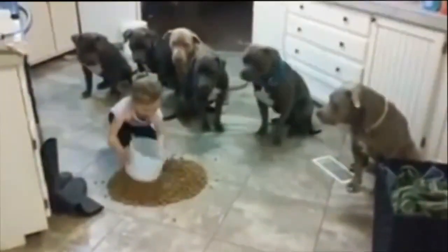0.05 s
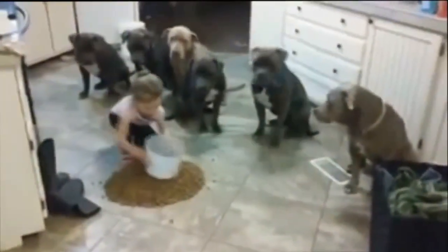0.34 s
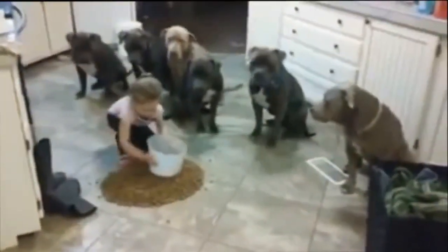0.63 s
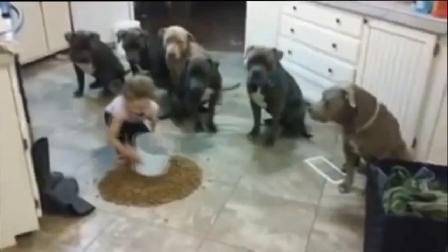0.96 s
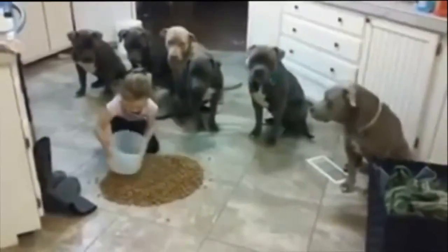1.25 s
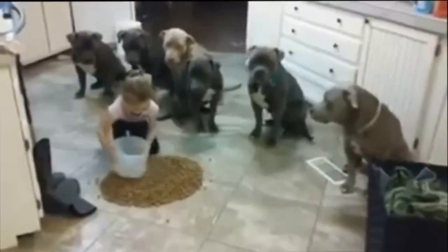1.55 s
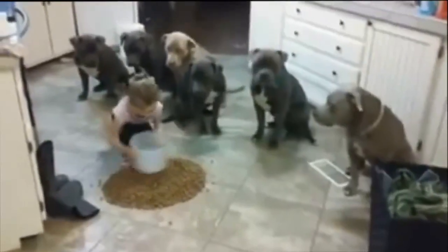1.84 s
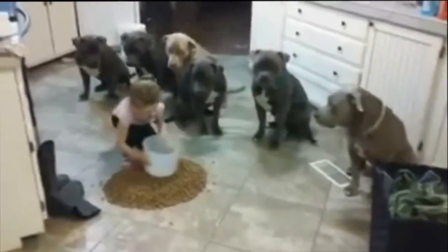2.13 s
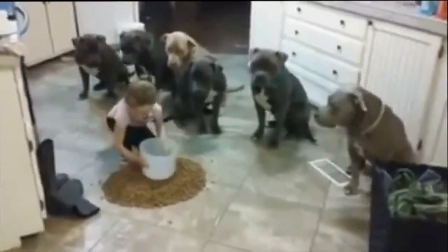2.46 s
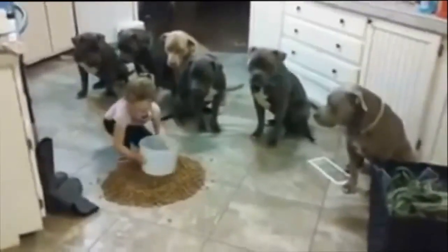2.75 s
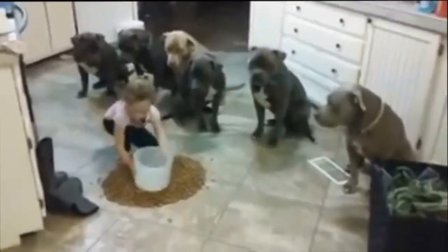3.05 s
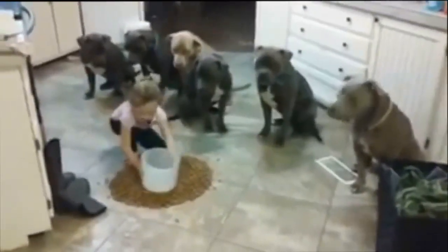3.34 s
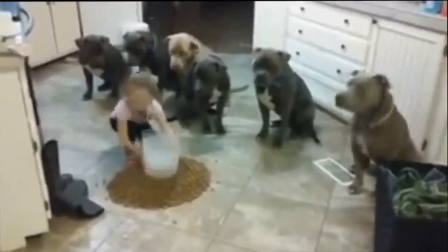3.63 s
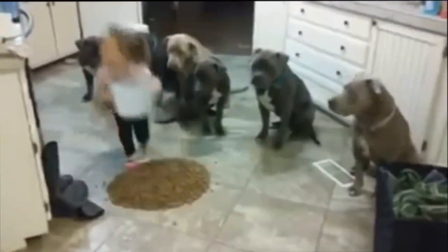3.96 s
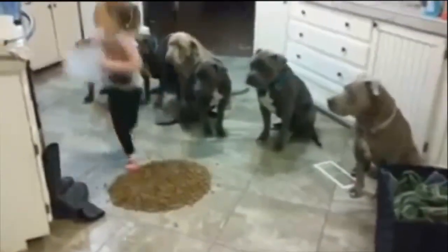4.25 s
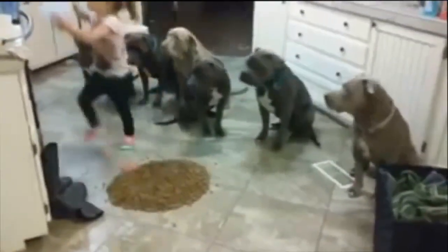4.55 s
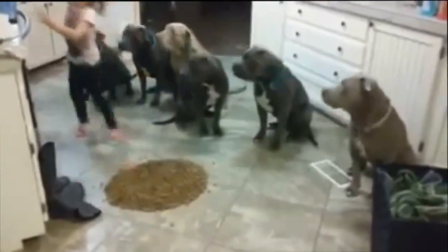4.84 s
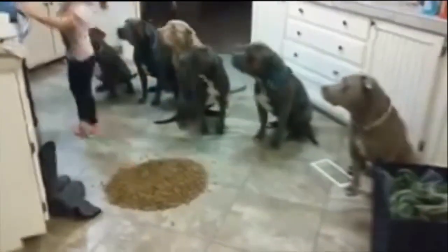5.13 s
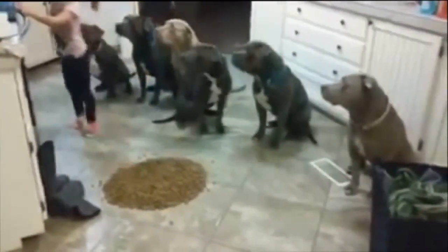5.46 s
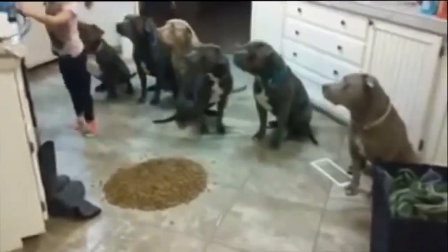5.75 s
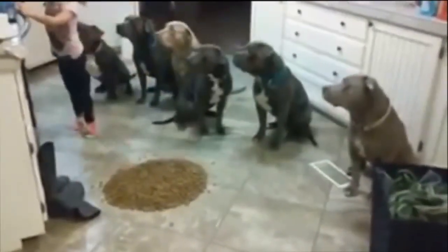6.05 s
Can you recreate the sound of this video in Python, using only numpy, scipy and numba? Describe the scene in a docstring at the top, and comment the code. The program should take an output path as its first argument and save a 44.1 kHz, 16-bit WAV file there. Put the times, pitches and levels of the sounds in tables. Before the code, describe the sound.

A hollow plastic tub scrapes through kibble on a hard floor, followed by soft footsteps and the tub knocking onto a counter.

```python
"""Dry dog food crunches and rattles as a child shoves it over a tiled kitchen floor with an empty plastic tub.
Stroke by stroke, colliding pellets drive the tub's ringing walls and drum-like base. Soft steps and
rustling clothes follow; the tub knocks down on a counter and rocks to rest.
The hard room rings briefly over a low, steady motor hum."""
import sys
import numpy as np
from scipy import signal
from scipy.fft import rfft, irfft
from scipy.io import wavfile
from scipy.ndimage import uniform_filter1d
from numba import njit

SR = 44100
rng = np.random.default_rng(int(sys.argv[2]) if len(sys.argv) > 2 else 0)


def materialize(psi):
    """Save the field psi as 16-bit PCM at rate SR to the path in sys.argv[1].

    A 1-D psi becomes a single channel; in a 2-D psi each row is a channel.
    """
    bounded = np.clip(np.atleast_2d(psi).T, -1, 1)
    quanta = np.round(bounded * 32767).astype(np.int16)
    wavfile.write(sys.argv[1], SR, quanta)


N = 269010
TIME = np.arange(N) / SR


def undb(db):
    """Decibels to gain."""
    return 10 ** (np.asarray(db) / 20)


def unit(x):
    """Scale to rms 1."""
    return x / np.sqrt(np.mean(x ** 2))


def add(track, start_s, sound):
    """Mix a sound into a track."""
    start = int(start_s * SR)
    track[start:start + len(sound)] += sound[:N - start]


def colour(x, points):
    """Minimum-phase filter through (Hz, dB) points, via the cepstrum."""
    hz, db = np.transpose(points)
    size = 4096
    bins_hz = np.maximum(np.fft.rfftfreq(size, 1 / SR), 1)
    curve_db = np.interp(np.log(bins_hz), np.log(hz), db)
    cepstrum = irfft(np.log(undb(curve_db)))
    cepstrum[1:size // 2] *= 2
    cepstrum[size // 2 + 1:] = 0
    return signal.oaconvolve(x, irfft(np.exp(rfft(cepstrum))))[:len(x)]


@njit
def resonate(x, hz, width_hz):
    """State-variable band-pass; unity gain at its moving centre."""
    y, band_state, low_state = np.empty(len(x)), 0., 0.
    for i in range(len(x)):
        g, damping = np.tan(np.pi * hz[i] / SR), width_hz / hz[i]
        band = (band_state + g * (x[i] - low_state)) / (1 + g * (g + damping))
        band_state = 2 * band - band_state
        low_state += 2 * g * band
        y[i] = damping * band
    return y


def resonate_twice(x, hz, width_hz):
    """Two equal band-passes in series."""
    return resonate(resonate(x, hz, width_hz), hz, width_hz)


def wander(rate_hz, count=N):
    """Gaussian values joined by straight lines."""
    t = TIME[:count]
    knots_s = np.arange(0, t[-1] + 1, 1 / rate_hz)
    return np.interp(t, knots_s, rng.standard_normal(len(knots_s)))


def judder(rate_hz, depth_db):
    """Randomly wavering gain, as in stick-slip; rms 1."""
    return unit(undb(depth_db * wander(rate_hz)))


def clicks(per_s, spread_db, count=N):
    """Tiny collisions of random time, sign and size; rms 1."""
    hits = rng.random(count) < per_s / SR
    size = np.minimum(rng.exponential(size=count), 4.5)
    return unit(hits * rng.choice([-1, 1], count) * undb(spread_db * size))


def decay(t, t60_s):
    """Exponential fall, 60 dB in t60_s."""
    return np.exp(-np.log(1000) * t / t60_s)


def blow(rise_s, t60_s, count):
    """Contact envelope: graze, full blow, decay; peak 1."""
    t = np.arange(count) / SR
    shape = (1 - np.exp(-t / rise_s)) ** 4 * decay(t, t60_s)
    return shape / shape.max()


def motion(start_s, attack_s, hold_s, release_db_per_s, swell_db=0):
    """Movement envelope: attack, hold or swell, release."""
    age_s = TIME - start_s
    db = swell_db * np.clip(age_s / hold_s, 0, 1) - release_db_per_s * np.maximum(age_s - hold_s, 0)
    return np.clip(age_s / attack_s, 0, 1) * undb(db)


def power_sum(gains):
    """Joint gain of overlapping movements."""
    return np.linalg.norm(gains, axis=0)


# Room air spectrum: (frequency [Hz], level [dB])
AIR_SPECTRUM = [(30, -15), (120, -10), (250, -12.5), (500, -22), (1000, -43.5), (2000, -22), (5000, -28.5),
                (12000, -23), (15000, -30.5)]


def hum_and_air():
    """A motor, likely the fridge, hums and rumbles over faint room air."""
    hum_hz, motor_db, air_db = 58.73, -53.5, -78
    hum = unit(np.sin(2 * np.pi * hum_hz * TIME) * judder(rate_hz=12, depth_db=1))
    rumble_spectrum = [(20, -12.5), (45, -3.5), (70, -10), (100, -14.5), (300, -44.5)]
    rumble = unit(colour(rng.standard_normal(N), rumble_spectrum))
    air = unit(colour(rng.standard_normal(N), AIR_SPECTRUM))
    return undb(motor_db) * (hum + undb(-10) * rumble) + undb(air_db) * air


def reflections():
    """Dense echoes off tiles and cupboards, treble lasting longest; unit energy."""
    t = np.arange(SR // 2) / SR
    noise = rng.standard_normal(len(t))
    low = signal.sosfiltfilt(signal.butter(3, 5500, fs=SR, output="sos"), noise)
    tail = low * decay(t, t60_s=.32) + (noise - low) * decay(t, t60_s=.54)
    tail *= t > .003
    return tail / np.linalg.norm(tail)


def kitchen(x, wet_db=-3.5):
    """Direct sound plus echoes whose pattern changes as child and tub move."""
    hop = SR // 4
    window = np.sin(np.pi * np.arange(2 * hop) / (2 * hop))
    padded = np.pad(x, (hop, 2 * SR))
    wet = np.zeros(len(padded))
    for start in range(0, N + hop, hop):
        echoes = signal.fftconvolve(padded[start:start + 2 * hop] * window, reflections())
        wet[start:start + len(echoes)] += echoes
    return (x + undb(wet_db) * wet[hop:hop + N]) / np.hypot(1, undb(wet_db))


# Clothing movements: (start [s], hold [s], relative level [dB])
CLOTH_MOVES = [ (3.688, 0.2, -56), (3.979, 0.021, -61), (4.371, 0.12, -63), (4.771, 0.024, -60),
               (4.845, 0.14, -61), (5.026, 0.11, -61), (5.23, 0.14, -67), (5.62, 0.02, -48),
               (5.738, 0.043, -54.5), (5.88, 0.081, -64.5), ]
# Fabric hiss: (frequency [Hz], level [dB])
CLOTH_SPECTRUM = [(60, -53), (600, -22), (1300, -13), (2300, -7), (3200, -15), (4200, -10), (5700, -14.5),
                  (8000, -5), (12500, 0.5), (15000, -2)]


def clothes(attack_s=.013, release_db_per_s=172):
    """Fabric rubs with a fine, uneven hiss as the child gets up and walks off."""
    gain = power_sum([undb(db) * motion(start_s, attack_s, hold_s, release_db_per_s)
                      for start_s, hold_s, db in CLOTH_MOVES])
    fibres = clicks(per_s=6200, spread_db=1.5) * judder(rate_hz=60, depth_db=1)
    return undb(1.5) * gain * unit(colour(fibres, CLOTH_SPECTRUM))


# Footfalls and cupboard bumps: (time [s], level [dB], rise [s], t60 [s])
THUDS = [(2.982, -56.5, 0.005, .07), (3.492, -46.5, 0.0061, 0.11), (4.020, -55.5, 0.0084, 0.054),
         (4.379, -41, 0.013, 0.19), (4.573, -39, 0.0072, 0.2), (4.780, -61.5, 0.0073, 0.33),
         (5.365, -35, 0.01, 0.28), (5.476, -49.5, 0.0045, 0.72)]
# Dull thud: (frequency [Hz], level [dB])
THUD_SPECTRUM = [(30, 2), (60, -3), (100, 3), (135, -4.5), (190, 0), (260, -8.5), (400, -27.5), (1000, -57),
                 (4000, -48)]


def steps():
    """Soft, heavy contacts thud through floor and cupboard."""
    out, count = np.zeros(N), SR // 2
    for time_s, db, rise_s, t60_s in THUDS:
        push = rng.standard_normal(count) * blow(rise_s, t60_s, count)
        add(out, time_s, undb(db) * push.std() * unit(colour(push, THUD_SPECTRUM)))
    return out


# Tub wall resonances: (frequency [Hz], width [Hz], level [dB])
TUB_WALL_MODES = [(519, 33, 3), (770, 14, -9), (858, 13, -1.5), (1020, 14, 3), (1143, 72, 3.5),
                  (1510, 130, -6.5), (1670, 72, 2.5), (1828, 56, 5), (2370, 90, -13.5), (2426, 54, -4.5),
                  (2770, 38, -21.5), (3860, 200, -24.5), (4060, 65, -22)]


def tub_walls(x, detune=.012):
    """The walls ring; flexing in the hands detunes each mode slightly."""
    out = 0
    for hz, width_hz, db in TUB_WALL_MODES:
        flexed_hz = hz * (1 + detune * wander(rate_hz=12, count=len(x)))
        out = out + undb(db) * resonate(x, flexed_hz, float(width_hz))
    return out


# Tub base resonances: (ratio to base note [1], level [dB])
TUB_BASE_MODES = [(0.999, 6), (1.332, -14), (1.6, -7.5), (2.101, -9.5)]


def tub_base(x, note_hz):
    """The struck base rings like a drum."""
    return sum(undb(db) * resonate_twice(x, np.full(len(x), float(note_hz * ratio)), width_hz=96.)
               for ratio, db in TUB_BASE_MODES)


def rocking(start_s=5.496, gap_s=.053, first_db=-34.5, loss_db=6.5):
    """Knock rows for the tub settling on the counter: evenly spaced, each weaker."""
    note_hz, base_db, treble_db, rise_s, t60_s = 434, -1.5, -12.5, .0051, .24
    return [(start_s + k * gap_s, first_db - k * loss_db, note_hz, base_db, treble_db, rise_s, t60_s)
            for k in range(5)]


# Tub hits on heap, cupboard and counter; glancing ones rise slowly:
# (time [s], level [dB], base note [Hz], base gain [dB], treble gain [dB], rise [s], chatter t60 [s])
TUB_HITS = [ (0.413, -17, 440, -29, -20, 0.0075, 0.34), (0.817, -43.5, 510, 10.5, -1, 0.0033, 0.093),
            (1.239, -34.5, 448, -26, -9, 0.0029, 0.095), (1.338, -32, 440, 6, -16, 0.0057, 0.083),
            (2.094, -17, 496, -0.5, -23.5, 0.0041, .13), (2.109, -34.5, 296, 2, -35, 0.0076, 0.32),
            (2.339, -32.5, 508, 8, -20.5, 0.0013, 0.053), (3.057, -39, 498, -5, -12.5, .007, 0.12),
            (3.612, -31, 457, -3.5, -20, 0.0083, 0.068), (4.563, -42, 415, 2.5, -5, .005, 0.25),
            (5.351, -45.5, 336, -3, -1, 0.0074, 0.11), (5.367, -31, 358, 8.5, -8, 0.0051, .12),
            (5.390, -34, 421, 8, -3, 0.0024, 0.56), (5.471, -24, 414, 6.5, -16, 0.003, .1),
            (5.912, -56, 325, 3.5, -13, .006, 0.13), (5.935, -51.5, 413, 3.5, -12.5, 0.011, 0.1), ]
# Dry plastic clack: (frequency [Hz], level [dB])
CLACK_SPECTRUM = [(60, -18.5), (150, -12), (260, -4), (400, -16), (560, -6), (900, -1), (1600, 0.5),
                  (2400, -3.5), (3200, -9), (4400, -12), (6000, -23), (15000, -35.5)]
# Crisp edge of knocks and pellet clicks: (frequency [Hz], level [dB])
CRISP_SPECTRUM = [(500, -34.5), (3500, -16), (5500, -3.5), (8000, 2.5), (10000, -1), (12300, 3.5),
                  (15000, -8.5)]


def tub_knocks():
    """Each blow is a quick chatter of contacts that clacks and rings walls and base."""
    out, count = np.zeros(N), SR // 2
    for time_s, db, note_hz, base_db, treble_db, rise_s, t60_s in TUB_HITS + rocking():
        contact = clicks(per_s=4600, spread_db=-1.5, count=count) * blow(rise_s, t60_s, count)
        clack = undb(-2) * unit(colour(contact, CLACK_SPECTRUM))
        walls = undb(-5.5) * unit(tub_walls(contact))
        base = undb(base_db) * unit(tub_base(contact, note_hz))
        crisp = undb(treble_db) * unit(colour(contact, CRISP_SPECTRUM))
        add(out, time_s, undb(db) * contact.std() * (clack + walls + base + crisp))
    return out


def rim_rasp(start_s=1.835, level_db=-29):
    """The rim skids off the heap with a short, falling rasp."""
    out, count = np.zeros(N), SR // 4
    skid = clicks(per_s=4000, spread_db=0, count=count) * blow(rise_s=.0083, t60_s=.12, count=count)
    sweep_hz = np.geomspace(2451.5, 1697.5, count)
    rasp = unit(resonate_twice(skid, sweep_hz, width_hz=1101.5))
    add(out, start_s, undb(level_db) * skid.std() * rasp)
    return out


def pellet_bounces(per_s, spread_db):
    """Single pellets clack together, each ringing briefly at its own pitch; rms 1."""
    out, t = np.zeros(N), TIME[:1000]
    centre_hz, spread_octaves, t60_cycles = 1650, .6, 14
    for when, pitch, size in rng.random((int(per_s * TIME[-1]), 3)):
        hz = centre_hz * 2 ** (spread_octaves * np.sqrt(3) * (2 * pitch - 1))
        gain = undb(spread_db * min(-np.log1p(-size), np.pi))
        add(out, when * TIME[-1], gain * np.cos(2 * np.pi * hz * t) * decay(t, t60_cycles / hz))
    return unit(out)


# Short shoves and long drags of the tub: (start [s], hold [s], level [dB], swell over hold [dB],
# release [dB/s], base note [Hz], base send [dB], crisp send [dB])
SHOVES = [ (-.02, 0.056, -21.5, -7, 289.5, 450, -7, -18.5), (0.41, 0.073, -23, 6.5, 114, 465, -5, -20.5),
          (0.519, 0.18, -27.5, 3.5, 168, 470, 2.5, -24), (0.806, 0.23, -37.5, 15.5, 366, 490, -2, -18),
          (1.248, 0.32, -31, 8.5, 108, 435, -5.5, -22), (1.588, 0.084, -31.5, 5, 129.5, 428, 1, -23),
          (1.701, .09, -28, 3, 189, 415, -5.5, -15), (2.092, 0.047, -23.5, 4, 244.5, 492, -4, -22.5),
          (2.172, 0.4, -27, -1, 274.5, 492, 2, -22.5), (3.051, 0.062, -40.5, 10.5, 146, 490, -1.5, -23),
          (3.163, 0.033, -40, -1, 109, 496.5, 4, -19.5), (3.33, 0.19, -55, 11.5, 95.5, 478, -2, -18),
          (3.484, 0.11, -42, 18.5, 263, 470, -3.5, -17.5), ]
# Pellet crunch: (frequency [Hz], level [dB])
CRUNCH_SPECTRUM = [(30, -45.5), (100, -17), (170, -16), (260, -18.5), (380, -2), (620, 2.5), (1100, 1.5),
                   (1500, 1), (2100, -2), (3000, -10.5), (4200, -13), (5200, -27.5), (7000, -47),
                   (15000, -57.5)]


def pellet_shoves(attack_s=.012):
    """Pellets tumble ahead of the rim; the same collisions drive the tub's walls and base."""
    pushes = np.array([undb(db) * motion(start_s, attack_s, hold_s, release_db_per_s, swell_db)
                       for start_s, hold_s, db, swell_db, release_db_per_s, *_ in SHOVES])
    start_s, hold_s, *_, base_hz, base_db, crisp_db = np.transpose(SHOVES)
    slip = judder(rate_hz=90, depth_db=2)
    pellets = clicks(per_s=3400, spread_db=1) * slip
    crumbs = clicks(per_s=5800, spread_db=2) * slip
    crunch = undb(-1.5) * unit(colour(pellets, CRUNCH_SPECTRUM))
    walls = undb(-9) * unit(tub_walls(pellets))
    clatter = undb(-11) * pellet_bounces(per_s=450, spread_db=2.5)
    note_hz = np.interp(TIME, start_s + hold_s / 2, base_hz)
    base = undb(-10) * unit(resonate_twice(pellets, note_hz, width_hz=220.))
    crisp = undb(2) * unit(colour(crumbs + pellets, CRISP_SPECTRUM))
    return (power_sum(pushes) * (crunch + walls + clatter)
            + power_sum(pushes * undb(base_db)[:, None]) * base
            + power_sum(pushes * undb(crisp_db)[:, None]) * crisp)


def scene():
    """All sources in the kitchen, mono."""
    action = pellet_shoves() + rim_rasp() + tub_knocks() + steps() + clothes()
    return (kitchen(action) + hum_and_air())[None]


def suppress_bass(x, threshold_db, slope, lag_s):
    """Noise suppressor: deep bass drops whenever the rest falls quiet."""
    bass = signal.sosfiltfilt(signal.butter(4, 90, fs=SR, output="sos"), x)
    rest = x - bass
    level_db = 10 * np.log10(np.abs(uniform_filter1d(rest ** 2, size=1024)) + 1e-12)
    pole = np.exp(-1 / (lag_s * SR))
    cut_db = signal.lfilter([1 - pole], [1, -pole], slope * np.minimum(level_db - threshold_db, 0))
    return rest + bass * undb(cut_db)


def record(dry):
    """The phone suppresses hum, rounds the loudest peaks and cuts the top."""
    ceiling, top_hz = .6, 15150
    quiet = suppress_bass(dry, threshold_db=-31.5, slope=.58, lag_s=.092)
    rounded = ceiling * np.tanh(quiet / ceiling)
    return signal.sosfilt(signal.ellip(10, .2, 80, top_hz, fs=SR, output="sos"), rounded)


dry = scene()
out = record(dry)
materialize(out)
```